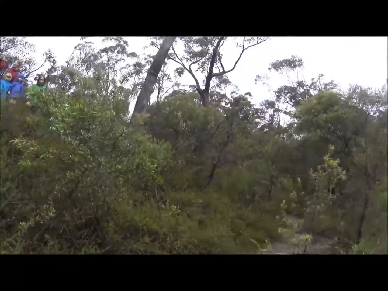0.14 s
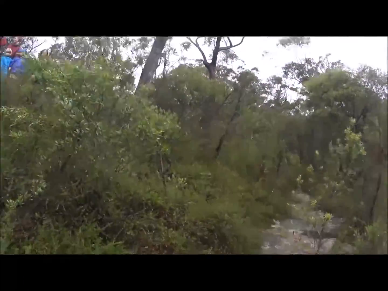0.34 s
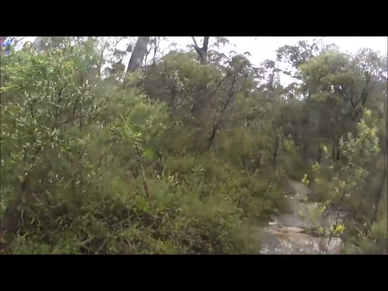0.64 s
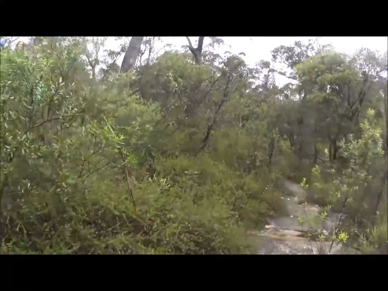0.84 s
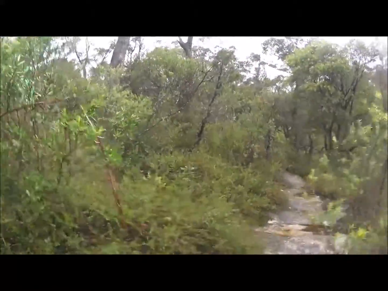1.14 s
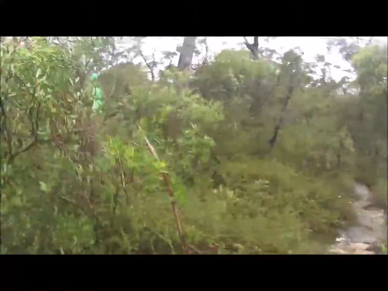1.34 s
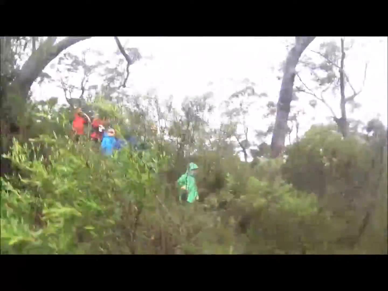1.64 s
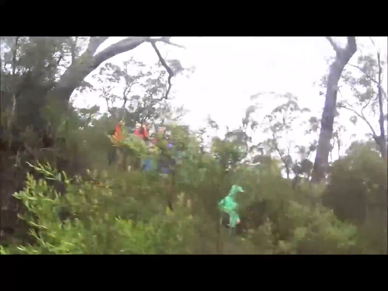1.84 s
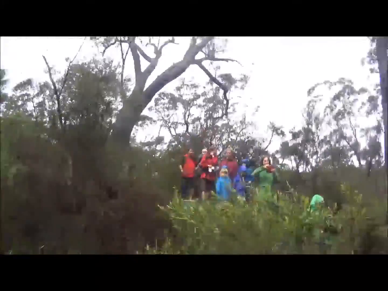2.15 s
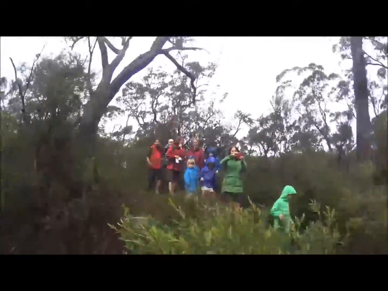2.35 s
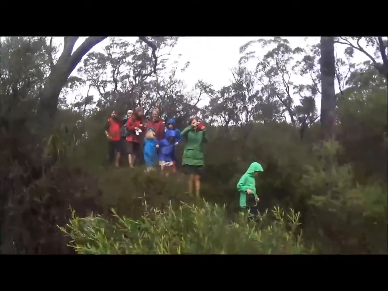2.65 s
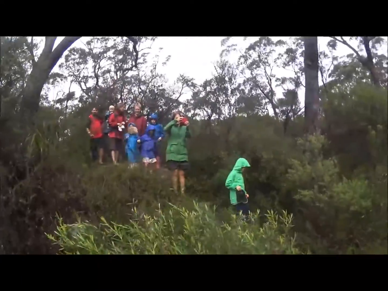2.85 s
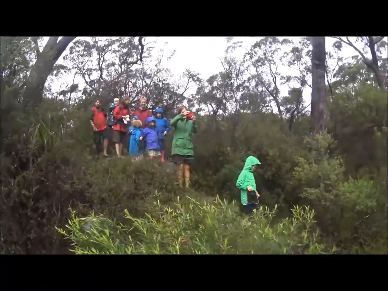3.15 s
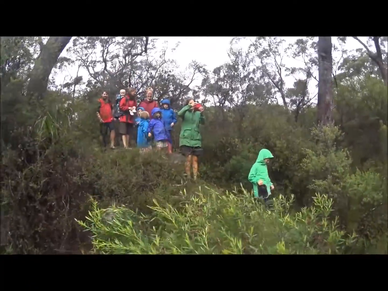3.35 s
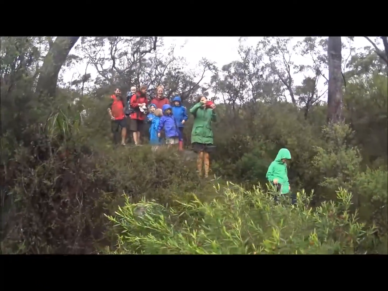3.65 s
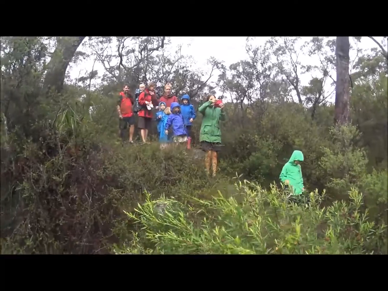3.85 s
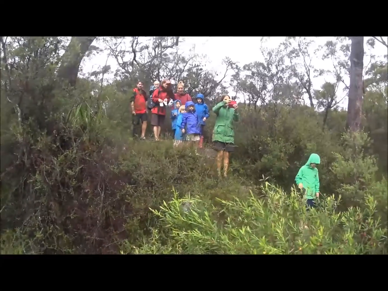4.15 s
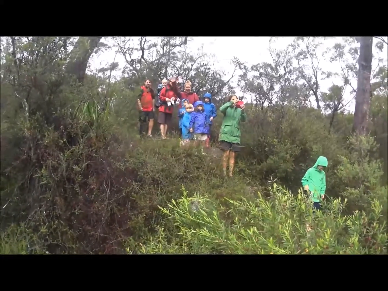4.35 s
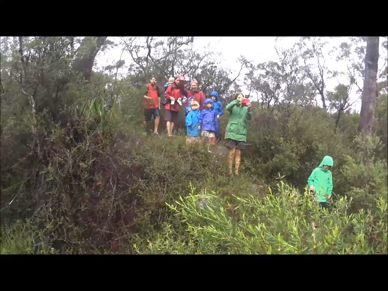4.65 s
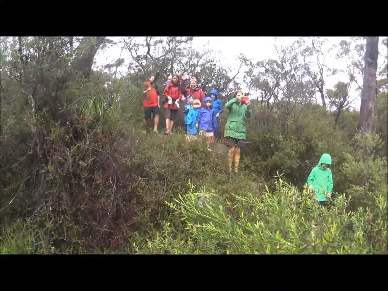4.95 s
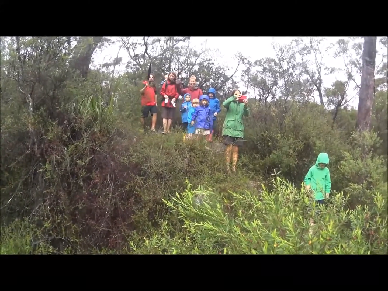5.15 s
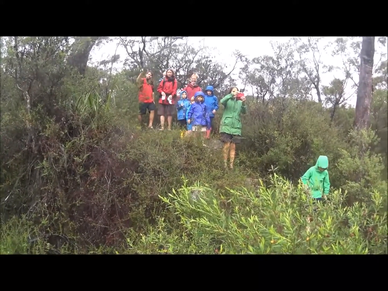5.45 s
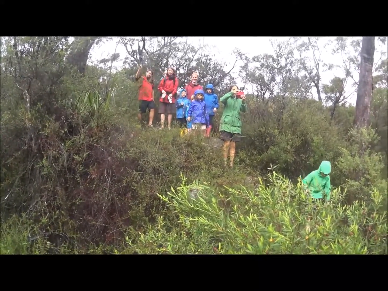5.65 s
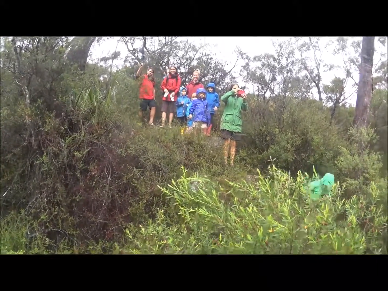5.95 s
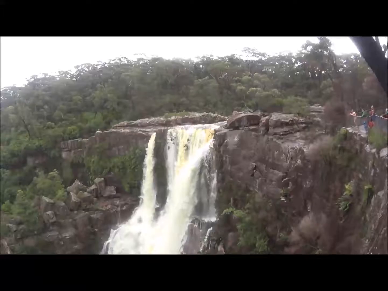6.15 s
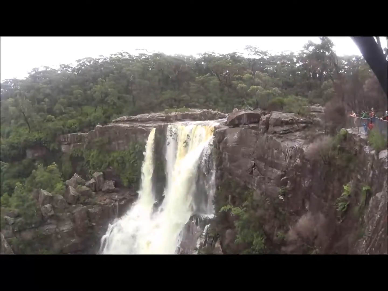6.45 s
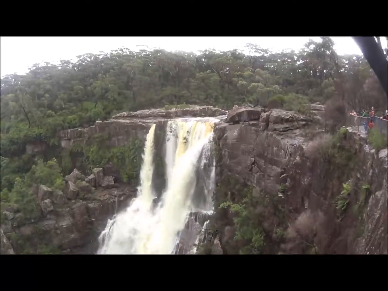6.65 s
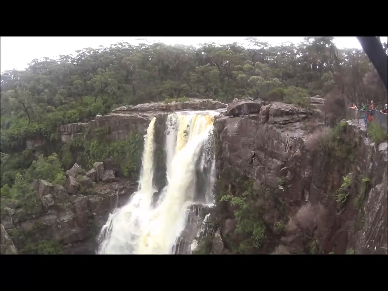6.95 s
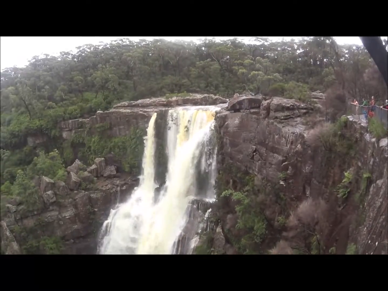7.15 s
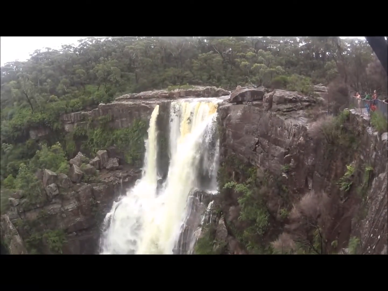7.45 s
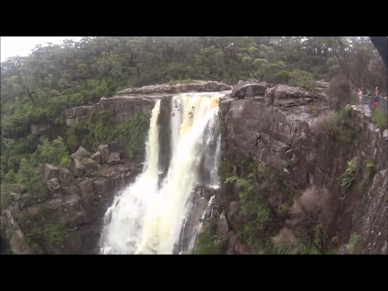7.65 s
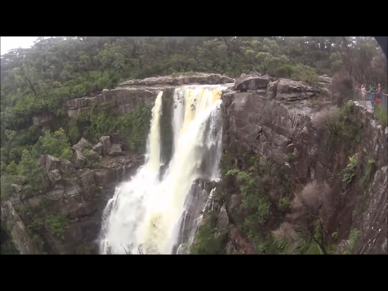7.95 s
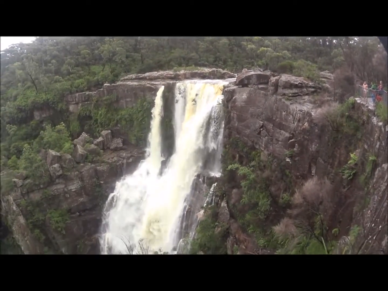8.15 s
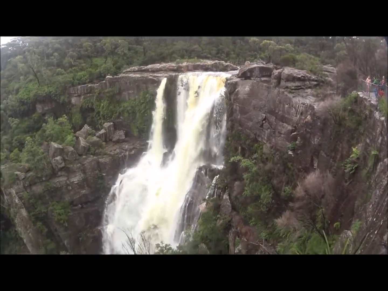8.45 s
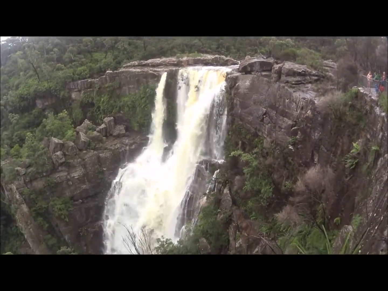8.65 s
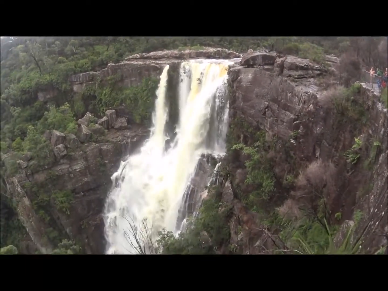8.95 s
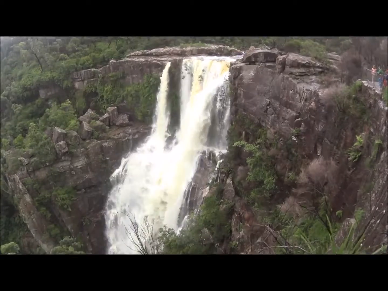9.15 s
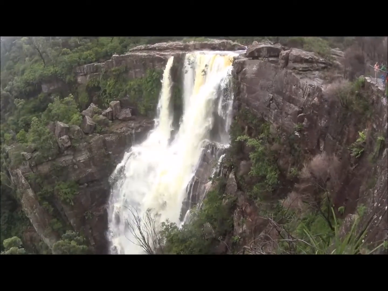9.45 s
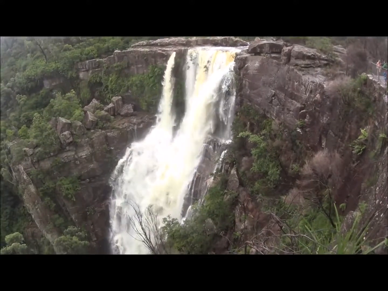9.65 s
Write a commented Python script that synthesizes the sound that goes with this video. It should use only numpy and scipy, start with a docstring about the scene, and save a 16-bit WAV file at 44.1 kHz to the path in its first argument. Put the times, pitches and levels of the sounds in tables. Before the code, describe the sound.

Outdoors, a handheld microphone picks up the even hiss of a creek. A cluster of sharp close ticks, scrapes and dull bumps comes from fingers on its housing, then settles to a faint rumble. After a couple more thuds and a knock, the sound switches abruptly to a big waterfall, clearly louder, its bright spray and deeper pool rushing steadily to the end.

```python
"""Creek walk, then a waterfall

A camera in a plastic housing is carried through wet bush. A creek rushes nearby, and its hiss
changes as the camera turns. The hand rumbles and bumps, and fingers rub, knock and squeak on the
housing; the creek's hiss ducks briefly at loud knocks and rubs. Then a sudden cut to a large
waterfall in flood, roaring across a gorge with a booming pool and hissing spray."""
import sys
import numpy as np
from scipy import signal
from scipy.fft import rfft, irfft, next_fast_len
from scipy.io import wavfile
from scipy.ndimage import uniform_filter1d, minimum_filter1d, map_coordinates

SR = 44100
rng = np.random.default_rng(int(sys.argv[2]) if len(sys.argv) > 2 else 0)


def waveform_to_disk(signal):
    """Save audio, clipped to [-1, 1], as 16-bit WAV at the path in sys.argv[1]."""
    frames = np.transpose(np.atleast_2d(signal))
    scaled = np.clip(frames, -1, 1) * 32767
    samples = np.round(scaled).astype(np.int16)
    wavfile.write(sys.argv[1], SR, samples)


N = 432621


def amp(db):
    """Turn decibels into a gain."""
    return 10 ** (np.asarray(db) / 20)


def unit(x):
    """Scale a sound so that the average of its channels has strength (rms) 1."""
    return x / np.sqrt(np.mean(x.mean(0) ** 2) + 1e-20)


def wobble(rate):
    """A smooth curve through random points, rate of them a second."""
    return map_coordinates(rng.standard_normal(int(N * rate / SR) + 4), [np.arange(N) * rate / SR])


def filtered(x, response):
    """Scale each frequency of x by response(hz)."""
    size = next_fast_len(N + SR // 2)
    return irfft(rfft(x, size) * response(np.fft.rfftfreq(size, 1 / SR)), size)[..., :N]


def coloured(pair, table):
    """Give two unrelated noises the tone and stereo spread of a table, at strength 1."""
    f, db, alike, balance_db = np.transpose(table)
    size = next_fast_len(N + SR // 2)
    hz = np.fft.rfftfreq(size, 1 / SR) + 1
    along = lambda column: np.interp(np.log(hz), np.log(f), column)
    end_fades = np.minimum(hz / f[0], 1) ** 3 * np.minimum(f[-1] / hz, 1) ** 8
    mid, side = rfft(pair, size) * amp(along(db)) * end_fades
    side *= np.tan(np.arccos(np.clip(along(alike), -.95, .99)) / 2)  # less alike sounds wider
    lean = amp(along(balance_db) / 2)
    return unit(irfft([(mid + side) * lean, (mid - side) / lean], size)[:, :N])


def clumped(x, patchy_db):
    """Scatter louder and softer patches over time and pitch."""
    spectra = signal.stft(x, nperseg=512)[2]
    patches = uniform_filter1d(rng.standard_normal(spectra.shape[1:]), size=7, axis=0)
    patches = uniform_filter1d(patches, size=14, axis=1)
    return signal.istft(spectra * amp(patchy_db * patches / patches.std()), nperseg=512)[1][:, :N]


def churn(patchy_db):
    """Two patchy noises, as water breaks in clumps."""
    return clumped(rng.standard_normal((2, N)), patchy_db)


def reflected(x, delay_s, echo_db):
    """A close surface adds a weak echo; it scatters the highest sounds away."""
    echo = lambda hz: amp(echo_db) * np.exp(-2j * np.pi * hz * delay_s) / (1 + (hz / 4000) ** 4)
    return filtered(x, lambda hz: 1 + echo(hz))


def turn_done(start_s=1.35, length_s=1.57):
    """How far the camera has turned, from 0 to 1; it starts and stops gently."""
    progress = np.clip((np.arange(N) / SR - start_s) / length_s, 0, 1)
    return np.sin(np.pi / 2 * progress) ** 2


# The creek's tone before and after the turn: f/Hz, relative level/dB,
# left-right likeness (1 = the same), left over right/dB
CREEK_BEFORE = [(25, -17, 0.92, 1), (140, -4, 0.95, -2.2), (290, -0.8, 0.98, -2.1), (560, -8, 0.87, -1.7),
                (1020, -8, 0.58, -3.5), (1270, -0.5, 0.73, -4.9), (1610, -12.5, 0.14, -1.3),
                (2130, -10.5, 0.6, 2), (2540, -1, 0.54, -4.5), (3400, -6.5, 0.42, -4), (4600, -5, 0.82, -2),
                (5920, -3.5, 0.5, -3), (6800, -13, 0.07, -3.5), (10550, -19.5, 0.5, -1.5)]
CREEK_AFTER = [(25, -8, 0.98, 1), (180, -1, 0.95, -1.9), (390, -0.5, 0.91, -2.5), (605, -5, 0.85, -3),
               (980, 0.3, 0.86, -2.5), (1460, -2.5, 0.36, -6.5), (1550, -8, 0.31, -4.5),
               (2120, -5.5, 0.2, 2), (2450, -6, 0.81, 1.0), (3230, -4.5, -0.14, 2), (6500, -1.3, 0.75, 0.8),
               (6760, -3.0, -0.17, 4), (8560, -6.5, 0.34, 0.5), (10750, -17.5, 0.31, 0)]


def creek(before_db=-26.5, after_db=-27.5, dip_db=2.1):
    """Water rushes steadily; its tone shifts and its level dips as the microphones turn."""
    turn = turn_done()
    db = before_db + (after_db - before_db) * turn - dip_db * np.sin(np.pi * turn ** 2)
    before = coloured(churn(patchy_db=1.27), CREEK_BEFORE)
    after = coloured(churn(patchy_db=0.66), CREEK_AFTER)
    after = reflected(after, delay_s=0.001714, echo_db=-20.0)
    return amp(db + 0.12 * wobble(4.8)) * (np.sqrt(1 - turn) * before + np.sqrt(turn) * after)


def press(s, rise_s, hold_s, release_s):
    """One press builds up to time s, holds and lets go, by 20 dB per rise or release time."""
    t = np.arange(N) / SR - s
    away = np.maximum(-t / rise_s, 0) + np.maximum((t - hold_s) / release_s, 0)
    return amp(-20 * np.minimum(away, 10))


# The tone of the hand's rumble: f/Hz, relative level/dB, left-right likeness, left over right/dB
GRIP_TONE = [(25, 3, .95, -5), (60, 0.5, 0.99, -3), (131, -4, 0.87, -5), (220, -17, .95, -10)]
# The hand changes its hold: t/s at full pressure, rise/s, hold/s, release/s, level/dB
GRIP_MOVES = [(0.335, .08, .075, .06, -46), (1.40, .1, .02, .09, -40), (2.03, .45, .3, 1.3, -37),
              (5.88, .4, .24, .2, -45)]


def grip_rumble(before_db=-63, after_db=-54):
    """The hand rumbles on the housing: louder after the turn, and swelling when the grip shifts."""
    holding = amp(before_db + (after_db - before_db) * turn_done())
    shifting = sum(amp(db) * press(*timing) for *timing, db in GRIP_MOVES)
    rumble = coloured(rng.standard_normal((2, N)), GRIP_TONE)
    return np.hypot(holding, shifting) * amp(2.9 * wobble(11)) * rumble


def strikes(rows, rise):
    """Each hit rings one note that dies by 60 dB over its cycles; rise is a share of that time."""
    out, t = np.zeros(N + SR), np.arange(SR // 8) / SR
    for s, db, hz, cycles in rows:
        age = hz * t / cycles
        ring = np.sin(2 * np.pi * hz * t) * amp(-60 * age) * (1 - np.exp(-age / rise))
        out[round(s * SR):][:len(t)] += amp(db) * ring / np.abs(ring).max()
    return out[:N]


# Soft bumps of the hand: t/s, level/dB, f/Hz
HAND_BUMPS = [(0.334, -26, 100), (0.401, -21, 269), (1.151, -20, 94), (1.384, -24, 118), (1.958, -18, 172),
              (2.062, -12, 144), (2.147, -9.5, 150), (2.311, -17.5, 62), (3.76, -23, 191),
              (3.91, -22.5, 161), (4.001, -25, 124), (5.65, -23.5, 105), (5.891, -12, 190),
              (5.933, -15, 210)]


def bumps():
    """The hand bumps the housing: low, short thuds, a little to the right."""
    return strikes([(s, db, hz, 3.5) for s, db, hz in HAND_BUMPS], rise=0.11) * amp([[-2], [2]])


def slips(rate, uneven_db):
    """Skin sticks and slips in tiny jerks of uneven size, rate of them a second."""
    jerks = np.zeros((2, N))
    slipping = rng.random((2, N)) < rate / SR
    push, spread = rng.standard_normal((2, slipping.sum()))
    jerks[slipping] = push * amp(uneven_db * spread)
    return jerks


def resonance(hz, centre_hz, width_hz):
    """How strongly something that rings at centre_hz answers each frequency."""
    return 1j * hz * width_hz / (centre_hz ** 2 - hz ** 2 + 1j * hz * width_hz)


# The housing's tone under a sliding fingertip, and under a dry, fast scrape:
# f/Hz, relative level/dB, left-right likeness, left over right/dB
RUB_TONE = [(110, -2, 0.98, -3.5), (230, 1.5, 0.97, -4.5), (430, -4.5, 0.87, -3), (900, -1.5, .1, 0.5),
            (1050, 1.5, 0.59, 1), (1300, -4, 0.68, -1), (1730, -2, 0.55, 0)]
SCRAPE_TONE = [(1670, -1, 0.52, -1.5), (2030, -3.5, .45, 2), (2260, 1.5, 0.66, -1), (2720, -1, .55, 0),
               (2970, -6, .1, 0), (3350, -10.5, -.2, 0), (3700, -12, 0, -1), (4250, -24, .3, 0),
               (6000, -14.5, 0.024, 2)]
# Finger strokes: t/s at full pressure, rise/s, hold/s, release/s, rub level/dB,
# scrape over rub/dB, hollow ring over rub/dB
FINGER_STROKES = [(1.133, .04, 0.013, 0.031, -22, -1, -4), (1.366, 0.1, .004, .14, -28.5, -8, -9),
                  (1.605, .07, .04, .1, -22, -1.5, -3), (1.70, .13, 0.073, .12, -22.5, 1, -1.5),
                  (1.913, 0.14, .024, .03, -17.5, -2, -5), (2.055, 0.035, 0.0046, .04, -23, 0, -5),
                  (2.133, .08, 0.019, 0.013, -20, 1, -4), (2.318, 0.03, 0.033, 0.12, -19, 1.5, -5),
                  (2.385, .04, 0.033, 0.16, -27.5, -2, 5)]


def rubbing():
    """Sliding fingers shake the housing: a dull rub, a bright scrape and the ring of the air inside."""
    power = np.zeros((3, N))
    for *timing, db, scrape_db, ring_db in FINGER_STROKES:
        power += (amp([[db], [db + scrape_db], [db + ring_db]]) * press(*timing)) ** 2
    rub_gain, scrape_gain, ring_gain = np.sqrt(power)
    judder = amp(1.14 * wobble(110))
    rub = coloured(clumped(slips(rate=9000, uneven_db=1.2), patchy_db=1.6), RUB_TONE)
    scrape = coloured(clumped(slips(rate=13000, uneven_db=1.7), patchy_db=1.3), SCRAPE_TONE)
    hollow = lambda hz: resonance(hz, centre_hz=1276, width_hz=270) ** 2
    ring = unit(filtered(rng.standard_normal((1, N)), hollow)) * amp([[-1.5], [1.5]])
    return judder * (rub_gain * rub + scrape_gain * scrape) + ring_gain * ring


# Fingertip knocks: t/s, level/dB, f/Hz, ring length/cycles, push level relative to the tick/dB
FINGER_KNOCKS = [(1.129, -9, 1950, 18, -20), (1.139, -1.5, 1760, 12, -4), (1.1445, -3, 1900, 16, -7),
                 (1.1535, -3, 1050, 9, -6), (1.2025, -1, 1230, 3.6, -24), (1.369, -16.5, 900, 11, -13),
                 (1.4165, -8.5, 1880, 7, -5.5), (1.603, -9, 1070, 4.1, -13), (2.057, -10, 1060, 12, -14),
                 (2.0849, -6, 1050, 4.3, -12), (2.1486, -4, 1220, 22, -13), (2.152, -6, 1880, 26, -21),
                 (6.001, -7, 1340, 6, -2)]


def knocks(push_hz=450, muffle_hz=2800):
    """Fingertips catch on the housing: each makes a sharp tick with a dull push behind it."""
    ticks = strikes([row[:4] for row in FINGER_KNOCKS], rise=0.068)
    pushes = strikes([(s, db + push_db, push_hz, 3) for s, db, _, _, push_db in FINGER_KNOCKS], rise=0.14)
    muffle = lambda hz: 1 / np.sqrt(1 + (hz / muffle_hz) ** 12)
    return filtered(ticks + pushes, muffle) * amp([[-1], [1]])


# Short dips in the creek's level: t/s, half-length/s, loss/dB
CREEK_DUCKS = [(1.15, .013, 4), (1.611, .008, 9), (1.929, 0.034, 10), (2.143, 0.025, 10)]


def creek_ducking():
    """A gain that ducks the creek's hiss briefly at the listed times, during loud knocks and rubs."""
    t = np.arange(N) / SR
    loss_db = sum(db * np.maximum(0, 1 - ((t - s) / half_s) ** 2) for s, half_s, db in CREEK_DUCKS)
    return amp(-loss_db)


def squeak(start_s=1.955, level_db=-34, from_hz=6000, to_hz=2300, sink_s=0.014):
    """A faint, quickly falling whistle as the hardest stroke lets go."""
    since = np.maximum(np.arange(N) / SR - start_s, 0)
    hz = to_hz + (from_hz - to_hz) * np.exp(-since / sink_s)
    gain = amp(level_db) * press(start_s, rise_s=0.008, hold_s=0.024, release_s=0.008)
    return gain * np.sqrt(2) * np.sin(2 * np.pi * np.cumsum(hz) / SR)


# The tones of the waterfall's pool and spray:
# f/Hz, relative level/dB, left-right likeness, left over right/dB
POOL_TONE = [(25, -11, 0.85, -1.2), (70, -8, 0.86, -1.7), (170, 1.1, 0.95, -2.5), (278, -3.5, 0.86, -2.1),
             (394, 1, 0.91, -1.5), (720, -7.5, 0.73, -3.7), (930, -6.5, 0.73, -3)]
SPRAY_TONE = [(1045, -11.5, 0.71, -4), (1197, -3, 0.76, -6), (1510, -5, 0.88, -2), (1980, -4.3, 0.59, 1.5),
              (2350, -1, 0.4, -7), (2940, -1.7, 0.93, -1.9), (3760, -5, 0.78, 0), (4530, 0, 0.95, -1.0),
              (5400, -4.5, 0.73, 0.4), (5890, -2, 0.84, 0.5), (6760, -9.5, 0.66, -2.5),
              (9500, -14, 0.79, 1.8), (10330, -12.5, 0.83, -0.5)]


def waterfall(pool_db=-34, spray_db=-16.5):
    """Heavy water booms in the pool while spray hisses off the rock; both surge with the flow."""
    surge = wobble(5)
    pool = amp(pool_db + 0.17 * surge + 0.45 * wobble(12)) * coloured(churn(patchy_db=1.23), POOL_TONE)
    spray = amp(spray_db + 0.11 * surge) * coloured(churn(patchy_db=0.63), SPRAY_TONE)
    return pool + spray


def scene(cut_s=6.143):
    """The walk by the creek, then a sudden cut to the waterfall."""
    walk = creek_ducking() * creek() + rubbing() + grip_rumble() + bumps() + knocks() + squeak()
    return np.where(np.arange(N) / SR < cut_s, walk, waterfall())


def limiter(x, ceiling_db, hold_s):
    """Peaks above the ceiling turn both channels down for a moment."""
    needed = np.minimum(1, amp(ceiling_db) / (np.abs(x).max(0) + 1e-9))
    span = int(hold_s * SR)
    held = minimum_filter1d(needed, span, origin=span // 4)
    return x * uniform_filter1d(held, span // 2)


def record(dry):
    """The camera tames its loudest peaks and drops the highest frequencies."""
    return filtered(limiter(dry, ceiling_db=-3.0, hold_s=0.027), lambda hz: hz < 11100)


dry = scene()
out = record(dry)
waveform_to_disk(out)
```